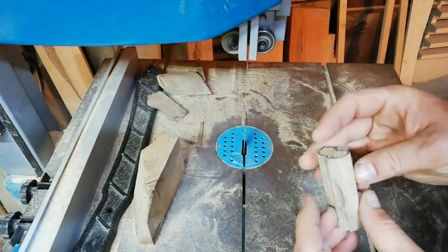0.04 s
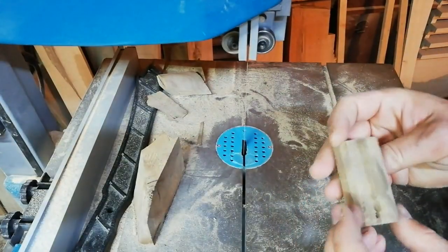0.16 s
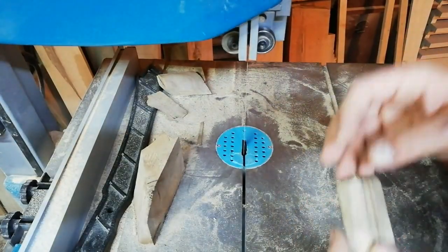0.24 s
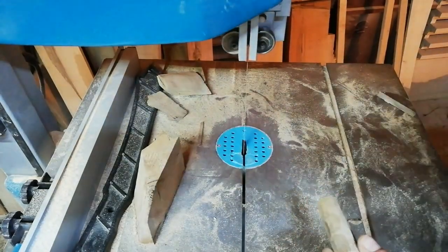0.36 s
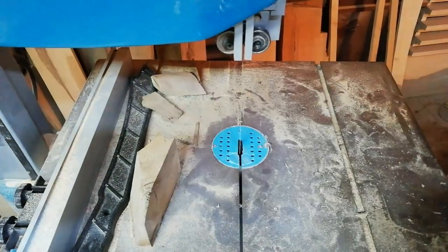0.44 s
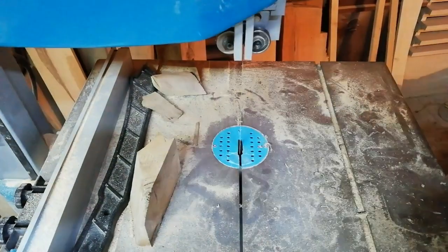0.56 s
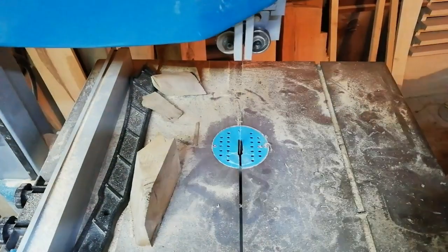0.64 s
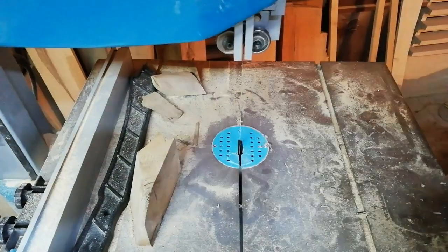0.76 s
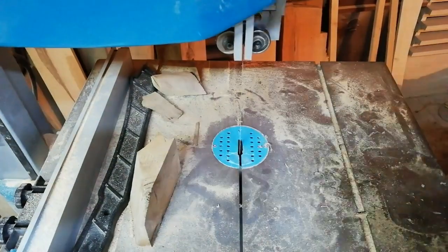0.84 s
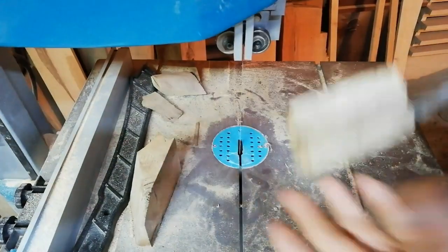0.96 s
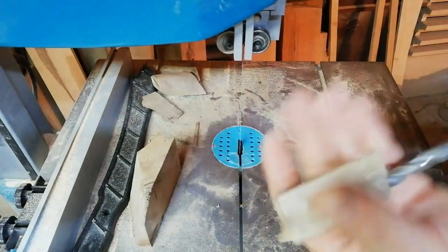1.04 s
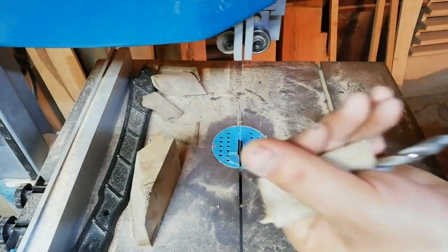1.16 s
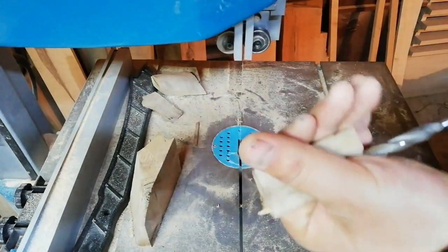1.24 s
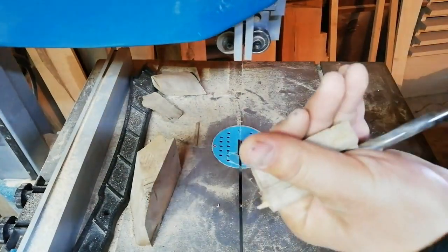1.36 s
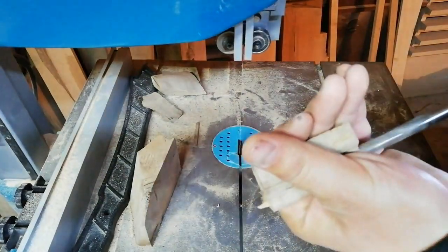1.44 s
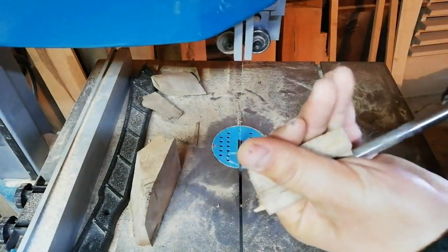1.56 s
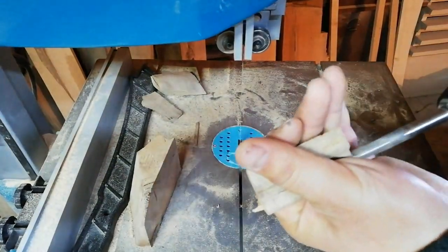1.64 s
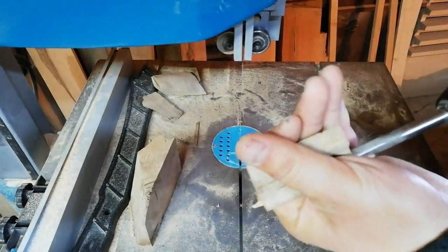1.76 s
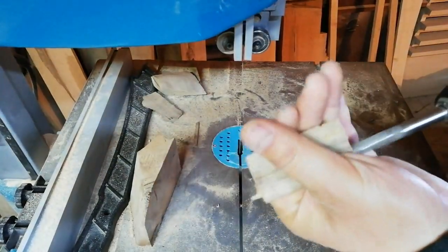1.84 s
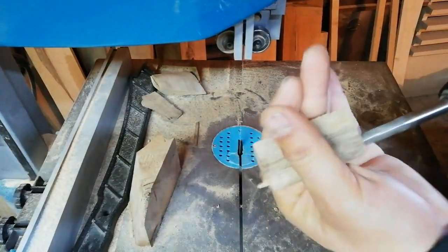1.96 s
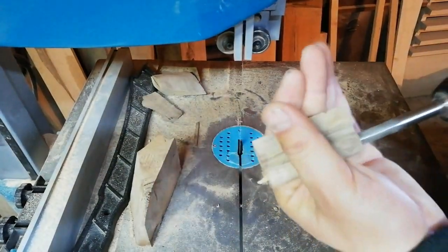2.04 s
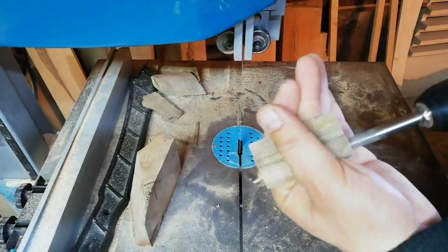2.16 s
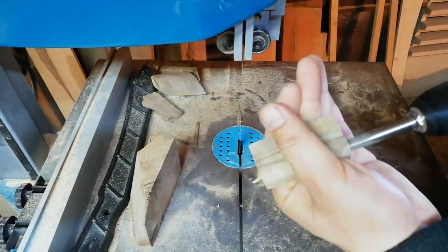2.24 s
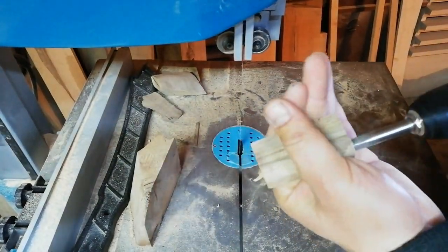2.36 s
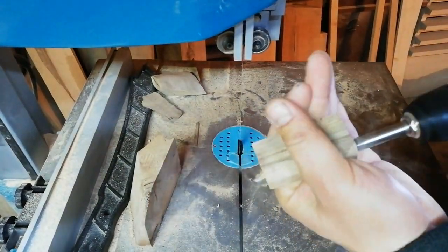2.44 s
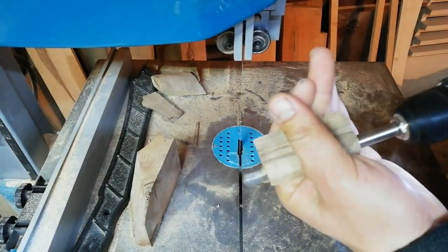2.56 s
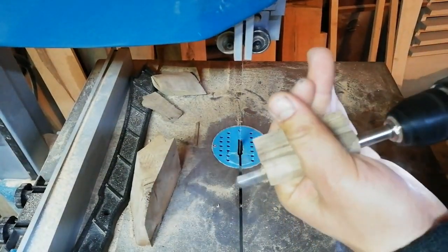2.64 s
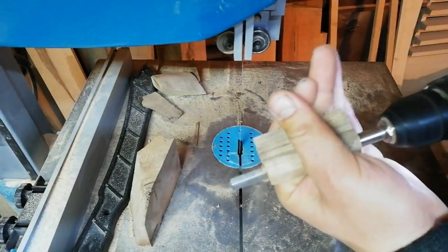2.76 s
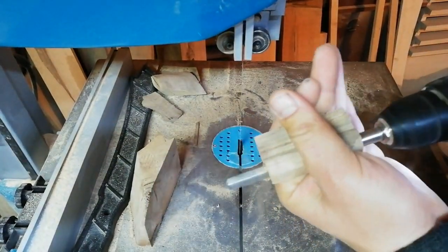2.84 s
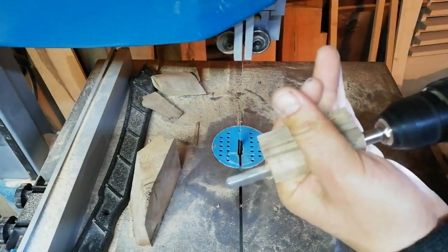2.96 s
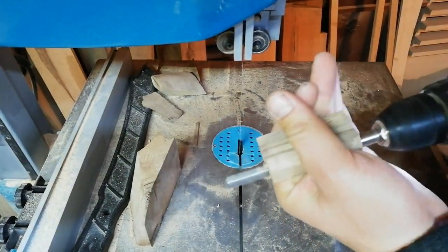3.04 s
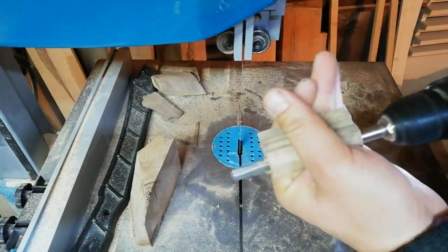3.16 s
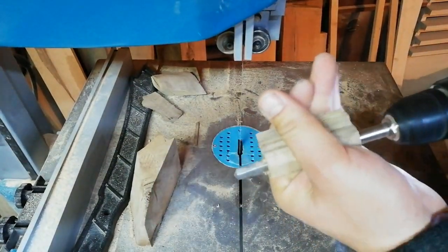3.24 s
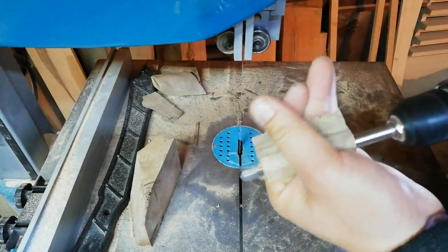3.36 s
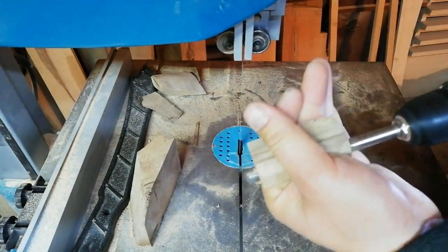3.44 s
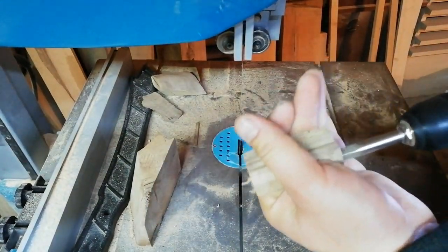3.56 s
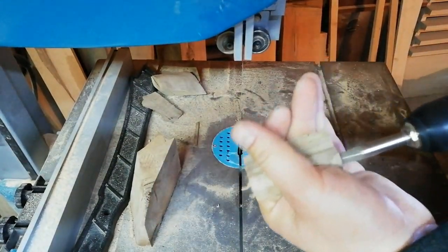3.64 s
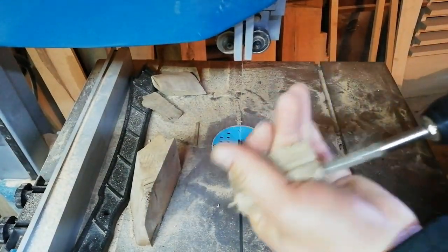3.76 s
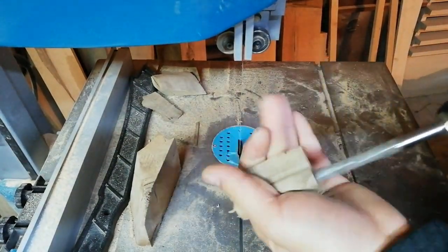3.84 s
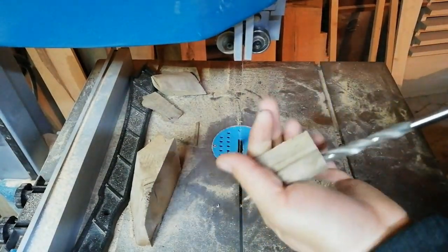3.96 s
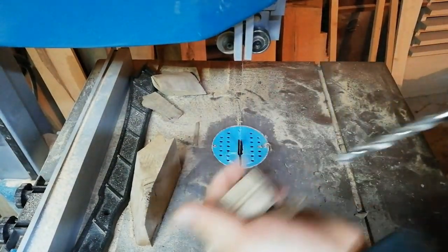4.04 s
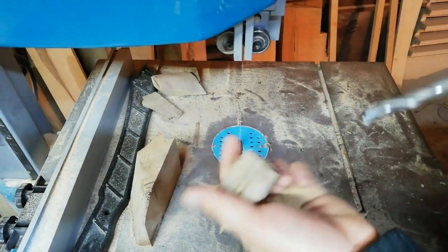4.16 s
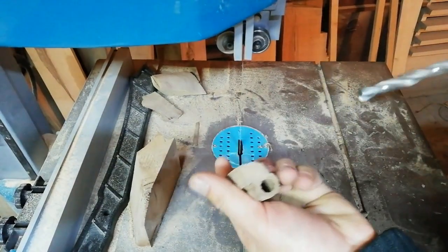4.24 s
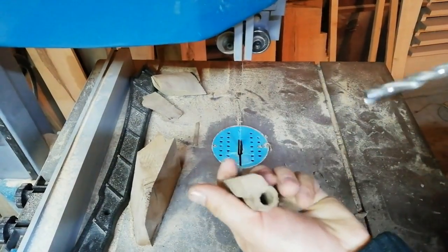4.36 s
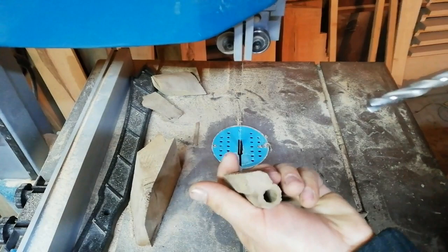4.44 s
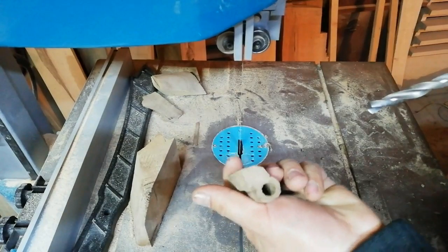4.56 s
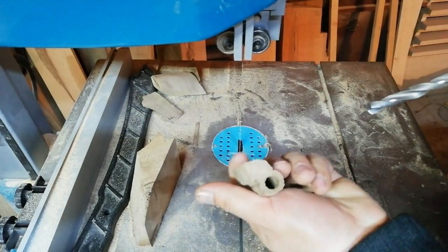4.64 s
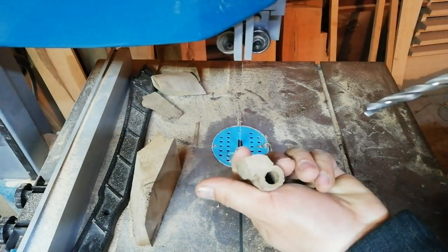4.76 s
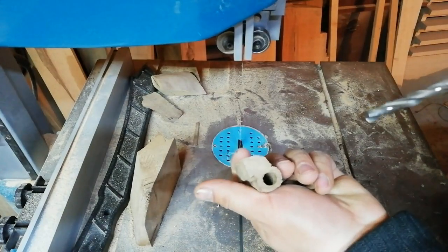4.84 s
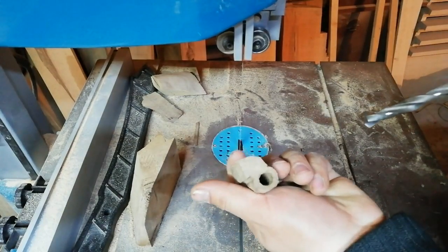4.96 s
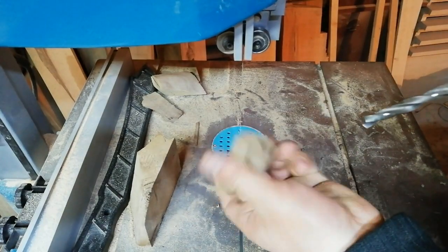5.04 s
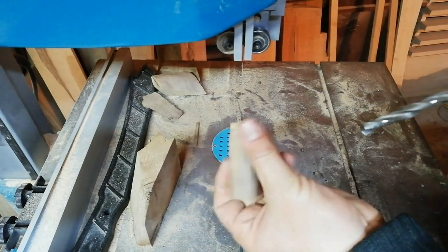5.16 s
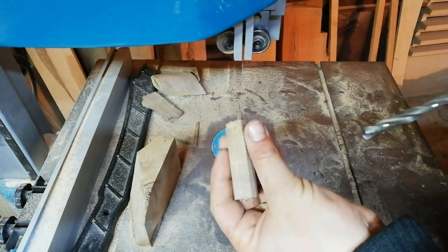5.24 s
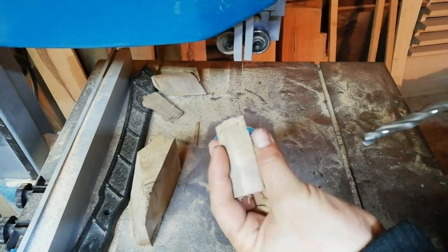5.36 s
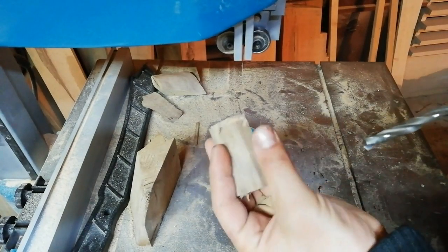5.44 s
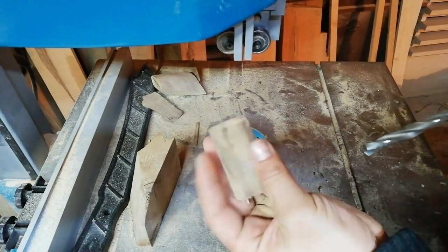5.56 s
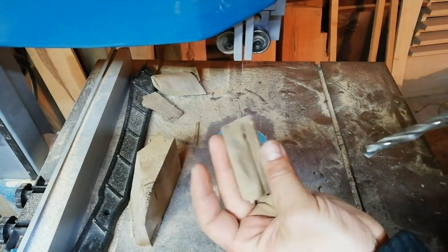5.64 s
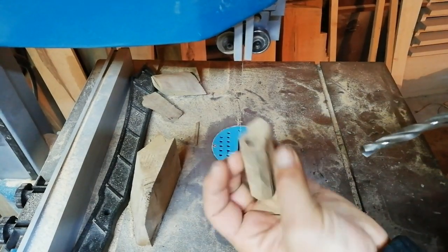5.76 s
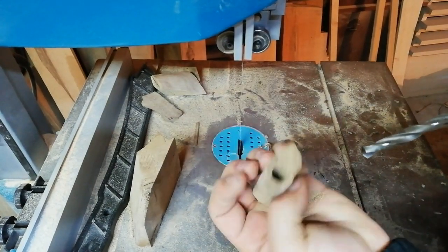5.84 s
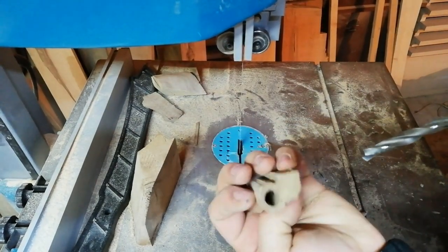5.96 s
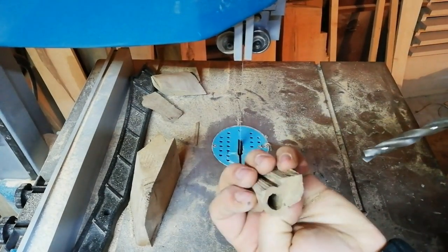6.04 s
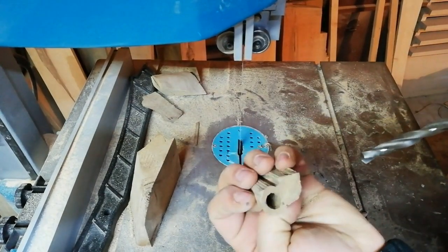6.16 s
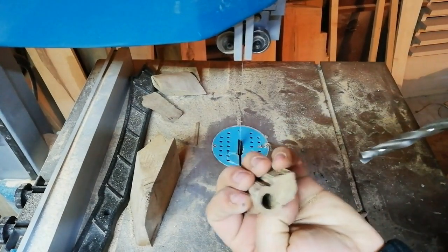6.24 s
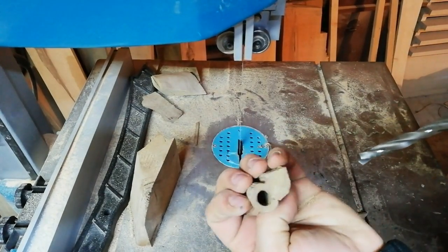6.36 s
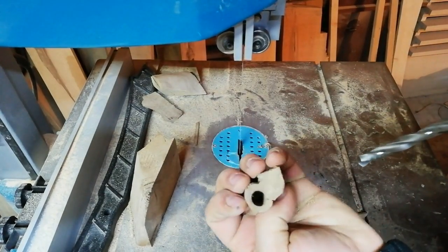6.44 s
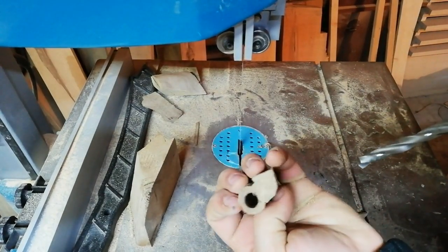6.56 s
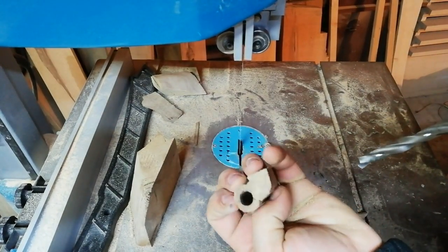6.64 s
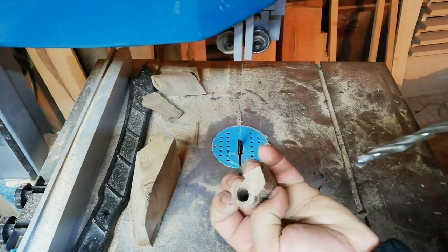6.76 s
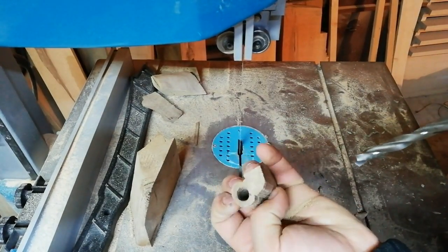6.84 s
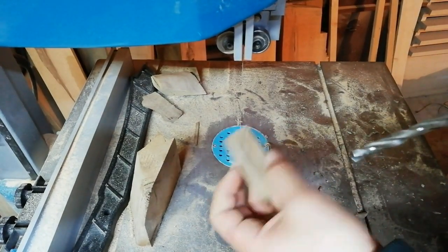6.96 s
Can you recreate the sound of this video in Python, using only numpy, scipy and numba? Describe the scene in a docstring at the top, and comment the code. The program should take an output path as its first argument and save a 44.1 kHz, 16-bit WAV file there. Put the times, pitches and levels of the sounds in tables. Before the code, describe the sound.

A band saw runs close by, a broad bright hiss with metallic ringing and tooth whine over low hum, until it is chopped off at about 0.45 s. Total silence lasts until 0.78 s, when a soft low thump brings in faint room tone. From 0.95 to 1.5 s fingers slide on a wood block, with small dry taps, the clearest near 1.24. At 1.5 s a drill starts, its gear whine dipping, then rising, over dry scraping. Piercing stuttering squeaks erupt around 2.3-2.9 s, pause in steadier grinding, return higher at 3.3-4.05 s, then lower at 4.25-4.55 s, so loud that everything else ducks. The whine climbs until the drill brakes at 4.73 s with a short gearbox clatter. Until nearly 7 s, faint finger rubs and tiny taps remain in the quiet workshop, close and left-leaning, with a short room tail.

```python
"""A band saw runs beside the microphone, cuts off into silence; a low thump brings the sound back.
Fingers slide on a hand-held wood block and it taps: filtered clicks and short decaying resonances.
A hand drill reams a hole: flutes scrape as dense filtered clicks, gears whine as rattling tones, and
where the bit binds it squeaks in short gliding tones that push a limiter down.
The gearbox clatters on braking; then fingers turn the block over."""
import sys
import numpy as np
from scipy import signal
from scipy.fft import rfft, irfft, next_fast_len
from scipy.io import wavfile
from scipy.ndimage import uniform_filter1d, minimum_filter1d
from numba import njit

SR = 44100
rng = np.random.default_rng(int(sys.argv[2]) if len(sys.argv) > 2 else 0)


def dump(signal):
    """Clip the signal to [-1, 1] and save it as 16-bit WAV at the path in sys.argv[1]."""
    limited = np.clip(np.atleast_2d(signal).T, -1, 1)
    pcm = np.round(limited * 32767).astype(np.int16)
    wavfile.write(sys.argv[1], SR, pcm)


N = 308461
TIME = np.arange(N) / SR
TOP_HZ = 16000

# squeaks of a flute on a tight spot, before scatter and lift: (first time [s], turns [count],
# nominal length [s], peak level [dB], start pitch [Hz], middle pitch [Hz], end pitch [Hz])
BINDS = [(2.3, 2, 0.0056, 1, 3450, 3147, 3020), (2.371, 3, .009, 4.5, 3050, 2980, 3520),
         (2.457, 3, .0062, 7.5, 3450, 3130, 3420), (2.537, 1, .0095, 5.5, 4370, 3800, 3340),
         (2.591, 5, .0105, 6.5, 3680, 4083, 3980), (2.621, 4, .0062, 5, 3000, 3755, 3950),
         (2.854, 1, 0.0047, 3, 3700, 3404, 3130), (2.887, 2, .005, -6, 3850, 3750, 3700),
         (2.915, 1, .0065, -12.5, 3550, 3490, 3500), (3.303, 1, .004, -11, 4360, 4710, 4810),
         (3.319, 1, 0.0049, -7, 4870, 4614, 4720), (3.416, 1, .005, -11, 5040, 4720, 4740),
         (3.477, 6, .0125, 8, 5150, 4760, 4450), (3.643, 2, .008, .5, 4920, 4726, 4530),
         (3.818, 2, .006, 6.5, 4650, 4880, 5100), (3.831, 2, .0055, -1, 4880, 4680, 4620),
         (3.87, 1, 0.0067, 6.5, 4820, 4510, 3530), (3.954, 1, .007, 4, 4850, 4750, 4690),
         (3.924, 2, .004, -6, 4730, 4770, 4760), (3.944, 1, .005, 4, 4870, 4990, 4700),
         (4.004, 1, .006, 8, 4685, 4910, 4610), (4.036, 1, .004, -4.5, 4700, 4840, 4800),
         (4.255, 1, .008, -15, 3350, 3436, 3700), (4.315, 1, .008, 5.5, 3800, 3780, 3980),
         (4.37, 3, .0105, 8.5, 3850, 4060, 4080), (4.34, 2, .0105, 3.5, 2850, 3750, 4600),
         (4.46, 2, .0045, 7, 3200, 3944, 3500), (4.538, 1, .009, 5, 4150, 3916, 3400)]
# treble balance of the squeaks: (frequency [Hz], gain [dB])
SQUEAK_TINT = [(5000, 0.5), (7000, 0.0), (9700, 4.5), (11500, -6), (15000, -7)]
# push on the drill: (time [s], scrape level [dB], gear load gain [dB])
PRESSURE = [(1.55, -26, -3), (1.75, -22, -2), (2.1, -21.3, -1), (2.25, -20.3, 5), (2.42, -17.5, -4.5),
            (2.75, -21, -1), (3.02, -17, 0), (3.45, -19, -0.5), (3.6, -16.5, 7), (4.0, -21, 2),
            (4.2, -18.5, 7), (4.45, -20, -1), (4.65, -19, 2)]
# drill motor speed: (time [s], gear whine [Hz])
MOTOR_SPEED = [(1.5, 1490), (1.55, 1395), (1.62, 893), (1.72, 950), (1.87, 1065), (2.15, 950), (2.24, 1280),
               (2.31, 1600), (2.45, 1645), (2.7, 1560), (3.15, 1480), (3.4, 1460), (3.55, 1395),
               (3.8, 1345), (4.0, 1375), (4.28, 1490), (4.65, 1670), (4.82, 1200)]
# flute scrape spectrum: (frequency [Hz], relative density [dB per Hz])
SCRAPE_SPECTRUM = [(59, -51.5), (100, -26), (389, -21.5), (547, -22), (676, -11.5), (970, -9), (1230, -15),
                   (1480, -9.5), (2000, -9), (2370, -6), (2990, -5), (6020, -3.5), (8460, -1), (9210, 5),
                   (16000, -30.5)]
# gear tones before load: (multiple of the whine [ratio], level [dB], rattle [0-1])
GEAR_TONES = [(.53, -49, 0.5), (1.0, -40.5, .65), (1.448, -46.5, .9), (1.999, -43.5, .9)]
# saw hiss spectrum: (frequency [Hz], relative density [dB per Hz])
SAW_SPECTRUM = [(40, -17.5), (100, -9), (150, -11), (230, -6.5), (300, -11), (480, -16), (650, -5),
                (1400, -11), (2000, -4), (3900, -10.5), (4700, -4.5), (6500, -5), (9600, 4), (15500, -19.5)]
# ringing of blade and guides: (frequency [Hz], width [Hz], level [dB])
SAW_MODES = [(783, 120, -37.5), (920, 38, -38.5), (1198, 40, -39.5), (1940, 90, -39.5), (2277, 80, -39.5),
             (2650, 70, -36.5), (3000, 70, -42.5), (3820, 70, -42), (4620, 150, -37.5), (12600, 25, -42.5)]
# saw tooth overtones, before a common lift: (multiple of the tooth rate [ratio], level [dB])
TOOTH_TONES = [(2, -46), (6, -38), (7, -47.5), (9, -39), (10, -46.5), (11, -53), (12, -35), (13, -36)]
# hum of saw motor and frame: (frequency [Hz], level [dB])
SAW_HUM = [(102.3, -43.5), (204.6, -41), (232, -44), (307, -53)]
# skin on wood spectrum: (frequency [Hz], relative density [dB per Hz])
SKIN_SPECTRUM = [(240, -38), (400, -16), (1020, -7), (1230, -6.5), (1740, -11), (2220, -9), (2470, -9.5),
                 (5270, -12), (9660, 0), (15000, -27)]
# finger strokes on the block: (time [s], peak level [dB], t60 [s])
STROKES = [(0.979, -49.5, 0.78), (1.115, -42.5, .38), (1.23, -48.5, .3), (1.3, -57.5, .4),
           (4.866, -51, 0.19), (4.93, -60, 0.35), (5.16, -52, 0.22), (5.67, -57, .25), (6.135, -56.5, 0.36),
           (6.199, -53.5, .9), (6.4, -54.5, .9), (6.65, -62.5, 0.66)]
# block and bit taps: (time [s], level [dB], centre [Hz], width [Hz], t60 [s])
TAPS = [(0.944, -47.5, 4000, 6000, 0.022), (1.067, -39.5, 8700, 2500, 0.017),
        (1.239, -29.5, 4050, 4950, 0.025), (1.374, -49.5, 1700, 910, 0.27), (1.439, -48, 7550, 3940, .015),
        (1.492, -44, 1900, 2000, 0.016), (4.878, -50, 1850, 4570, 0.076), (5.141, -52, 5000, 9000, .02),
        (5.172, -47, 8300, 2490, 0.075), (5.689, -62, 6620, 201, 0.27), (6.655, -55.5, 1140, 503, 0.52)]
# room tone spectrum: (frequency [Hz], relative density [dB per Hz])
FLOOR_SPECTRUM = [(30, -11), (70, -2), (130, -7), (230, -4.5), (380, -15), (560, -20.5), (900, -17),
                  (1500, -19), (2500, -21), (4500, -22), (9500, -25.5), (15000, -38.5)]
# difference of the ports in room tone, weak in the bass: (frequency [Hz], gain [dB])
SIDE_TINT = [(100, -12.5), (400, -1), (1500, 0.0)]
# shading of the right port from the work: (frequency [Hz], gain [dB])
PORT_SHADE = [(100, -2.5), (380, -1.5), (700, -6.5), (1300, -9.5), (2400, -15.5), (3500, -16),
              (4700, -22.5), (8000, -29.5), (15000, -30.5)]

WHINE_PER_TURN = 90
START_S, ATTACK_S, BRAKE_S, BRAKE_DB_PER_S = 1.5007, 0.04, 4.727, 470
GRIP_S, FULL_GRIP_DB = 0.09, 3  # reach around a squeak; squeak level of a fully bound bit
SQUEAK_LIFT_DB, SQUEAK_SCATTER, SQUEAK_SCATTER_DB = 1.5, 0.02, 0.98  # scatter: share of pitch; level
CHATTER_DB, CHATTER_GRIP_DB, CHATTER_DB_PER_OCTAVE = -46, 20, -7
BLOCK_DB, BLOCK_GRIP_DB, GEAR_GRIP_DB = -35, -9, -3.5
CLATTER_DB, CLATTER_S = -29, 0.035
SAW_OFF_S, THUMP_S = 0.442, 0.778
SAW_HISS_DB, TOOTH_HZ, TOOTH_LIFT_DB = -22, 770, 1.0
STROKE_ATTACK_S, FLOOR_DB = 0.014, -65.5


def drill():
    """Two flutes scrape the hole and ring the block; near a squeak the bit chatters at its pitch."""
    scrape_db, _ = curves(PRESSURE)
    close, tight, grip_hz = grip()
    angle = turns()
    flutes_db = 0.56 * np.sin(4 * np.pi * angle) + 0.47 * np.sin(2 * np.pi * angle)
    bite = undb(flutes_db + 1.2 * walk(450))
    scrape = unit(colour(grains(rate_hz=26000, spread_db=-0.1), SCRAPE_SPECTRUM)) * undb(scrape_db)
    knocks = grains(rate_hz=6000, spread_db=-1.0)
    block = unit(resonate(resonate(knocks, 1750, 1800), 1750, 2400))
    block = block * undb(BLOCK_DB + BLOCK_GRIP_DB * tight)
    octaves = np.log2(grip_hz / 3500)
    chatter_db = CHATTER_DB + close * (CHATTER_GRIP_DB + CHATTER_DB_PER_OCTAVE * octaves)
    chatter_hz = grip_hz * (1 + 0.032 * walk(130))
    # complex noise turns the chatter tone into a narrow band
    smear = walk(600) + 1j * walk(600)
    chatter = np.real(smear * np.exp(2j * np.pi * np.cumsum(chatter_hz) / SR))
    chatter = chatter * undb(chatter_db + 4.8 * walk(140))
    return bite * (scrape + block + chatter) * trigger()


def squeaks(rough=0.016, flutter_db=2.03, rasp=0.28, swell=0.9, fullness=0.59):
    """A flute sticks and slips in short gliding tones; low ones carry stronger overtones."""
    overtone_db, fall_db, pitch_db_per_octave = -15.5, -6.5, -17
    out = np.zeros(N)
    waver = 1 + rough * walk(1500)
    flutter = undb(flutter_db * walk(500))
    grit = 1 + rasp * walk(2500)
    rows = catches()
    for (s, length_s, db, *pitch_hz), chance in zip(rows, rng.standard_normal((len(rows), 4))):
        db = db + SQUEAK_SCATTER_DB * chance[0]
        pitch_hz = pitch_hz * (1 + SQUEAK_SCATTER * chance[1:])
        u = np.linspace(0, 1, max(int(1.1 * length_s * SR), 32))
        at = int(s * SR) + np.arange(len(u))
        # parabola through start, middle and end pitch
        hz = np.polyval(np.polyfit([0, 0.5, 1], pitch_hz, 2), u) * waver[at]
        phase = 2 * np.pi * np.cumsum(hz) / SR
        octaves = np.log2(hz / 3500)
        tone = np.sin(phase)
        for k in range(2, 5):
            db_k = overtone_db + fall_db * (k - 2.5) + pitch_db_per_octave * octaves * (k - 1)
            tone += grit[at] * undb(db_k) * np.sin(k * phase) * (k * hz < TOP_HZ)
        envelope = np.abs(np.sin(np.pi * u ** swell)) ** fullness
        out[at] += undb(db) * tone * flutter[at] * envelope
    # the bit rings on briefly
    ring = 0.14 * resonate(out, 3800, 90) + 0.3 * resonate(out, 4010, 100)
    ring = ring + 0.16 * resonate(out, 4200, 120)
    return colour(out + ring, SQUEAK_TINT) * undb(SQUEAK_LIFT_DB)


def gears(rattle_hz=170):
    """Gear tones follow motor speed, upper ones fading when slow; tooth play smears and clatters."""
    whine_hz, = curves(MOTOR_SPEED)
    _, load_db = curves(PRESSURE)
    _, tight, _ = grip()
    mesh = 2 * np.pi * np.cumsum(whine_hz) / SR
    tones = 0
    for k, db, rattle in GEAR_TONES:
        size = 1 + 0.29 * walk(30) + rattle * (walk(rattle_hz) + 1j * walk(rattle_hz))
        speed_gain = np.minimum(whine_hz / 1400, 1) ** (6 * (k - 0.5))
        tones = tones + undb(db) * np.real(size * np.exp(1j * k * mesh)) * speed_gain
    knocks = grains(rate_hz=6000, spread_db=-3.5)
    clatter = unit(resonate(resonate(knocks, 1500, 1600), 1500, 2200)) * undb(CLATTER_DB)
    clatter = clatter * np.exp(-np.abs(TIME - BRAKE_S) / CLATTER_S)
    return (tones * undb(load_db + GEAR_GRIP_DB * tight) + clatter) * trigger()


def turns():
    """Turns made by the bit: the integral of gear whine over whine cycles per turn."""
    return np.cumsum(curves(MOTOR_SPEED)[0]) / SR / WHINE_PER_TURN


def trigger():
    """Gain of the running drill: quick start, hold, braking."""
    attack = np.clip((TIME - START_S) / ATTACK_S, 0, 1) ** 2
    return attack * undb(-BRAKE_DB_PER_S * np.clip(TIME - BRAKE_S, 0, 1))


def catches():
    """Squeaks in order of time: each bind recurs at the same angle of the bit."""
    angle = turns()
    rows = []
    for first_s, count, *squeak in BINDS:
        first_angle = np.interp(first_s, TIME, angle)
        for k in range(round(count)):
            rows.append((np.interp(first_angle + k, angle, TIME), *squeak))
    return np.array(sorted(rows))


def grip():
    """Wood tightens before a squeak, loosens after: closeness (0-1), tightness (0-1), pitch [Hz]."""
    s, _, db, _, middle_hz, _ = catches().T
    nearest = np.searchsorted((s[1:] + s[:-1]) / 2, TIME)
    close = np.exp(-((TIME - s[nearest]) / GRIP_S) ** 2)
    tight = close * np.interp(TIME, s, np.minimum(undb(db - FULL_GRIP_DB), 1))
    return close, tight, uniform_filter1d(np.interp(TIME, s, middle_hz), size=4400)


def saw():
    """Blade hiss from filtered clicks, ringing from noise-fed modes, overtones of passing teeth."""
    hiss = unit(colour(grains(rate_hz=14000, spread_db=5.5), SAW_SPECTRUM)) * undb(SAW_HISS_DB)
    ring = 0
    for hz, width_hz, db in SAW_MODES:
        ring = ring + undb(db) * unit(resonate(rng.standard_normal(N), hz, width_hz))
    teeth = 2 * np.pi * np.cumsum(TOOTH_HZ + 0.5 * walk(40)) / SR
    whine = sum(undb(db + 2.9 * walk(42)) * np.sin(k * teeth) for k, db in TOOTH_TONES)
    return (hiss + ring + undb(TOOTH_LIFT_DB) * whine) * undb(1.4 * walk(60)) * gate(0, SAW_OFF_S)


def saw_hum():
    """The saw motor shakes the frame: wavering sines, alike at both ports."""
    hum = sum(undb(db + 3.0 * walk(18)) * np.sin(2 * np.pi * hz * TIME) for hz, db in SAW_HUM)
    return hum * gate(0, SAW_OFF_S)


def hands():
    """Skin slides on wood in decaying strokes of clicks; block and bit tap as decaying resonances."""
    out = np.zeros(N)
    slide = unit(colour(grains(rate_hz=5000, spread_db=-1.0), SKIN_SPECTRUM))
    for s, db, t60_s in STROKES:
        attack = np.clip((TIME - s) / STROKE_ATTACK_S, 0, 1)
        decay = np.exp(-np.log(1000) * np.maximum(TIME - s - STROKE_ATTACK_S, 0) / t60_s)
        out += slide * undb(db) * attack * decay
    for s, db, hz, width_hz, t60_s in TAPS:
        age_s = np.maximum(TIME - s, 0)
        envelope = undb(db - 60 * np.minimum(age_s / t60_s, 4)) * (TIME >= s)
        out += unit(resonate(rng.standard_normal(N), hz, width_hz)) * envelope
    return out


def thump(step_db=-24.5, settle_s=0.145, rumble_db=-41, rumble_s=0.031):
    """A step swings past rest and settles, with a short low rumble, as the sound returns."""
    age_s = np.maximum(TIME - THUMP_S, 0)
    step = -undb(step_db) * (1 - age_s / settle_s) * np.exp(-age_s / settle_s)
    rumble = unit(resonate(rng.standard_normal(N), 46, 23))
    rumble = undb(rumble_db) * rumble * np.exp(-age_s / rumble_s)
    return uniform_filter1d((step + rumble) * (TIME >= THUMP_S), size=3)


def quiet():
    """Room tone after the thump: bass mostly shared by both ports, hiss not."""
    mid, side = (unit(colour(rng.standard_normal(N), FLOOR_SPECTRUM)) for _ in range(2))
    side = colour(side, SIDE_TINT)
    return undb(FLOOR_DB) * np.array([mid + side, mid - side]) * (TIME > THUMP_S)


def workshop(x, t60_s=0.22, room_db=-19, near_db=-15, near_t60_s=0.15):
    """Reflections off table and saw frame plus room tail: two decaying noise responses."""
    t = TIME[:SR // 3]

    def tail(decay_s):
        """Decaying noise of unit energy after a 2 ms gap."""
        noise = rng.standard_normal(len(t)) * np.exp(-np.log(1000) * t / decay_s) * (t > 0.002)
        return noise / np.linalg.norm(noise)

    response = undb(near_db) * tail(near_t60_s) + undb(room_db) * tail(t60_s)
    return signal.fftconvolve(x, response)[:N]


def undb(db):
    """Decibels to gain."""
    return 10 ** (np.asarray(db) / 20)


def unit(x):
    """Scale to rms 1."""
    return x / np.sqrt(np.mean(x ** 2))


def curves(table):
    """Columns of a timed table, interpolated at each sample."""
    s, *columns = np.transpose(table)
    return [np.interp(TIME, s, c) for c in columns]


def colour(x, points):
    """Zero-phase filter through (frequency [Hz], gain [dB]) points on a log frequency axis."""
    hz, db = np.transpose(points)
    size = next_fast_len(N + 4096)
    f = np.maximum(np.arange(size // 2 + 1) * SR / size, 1)
    gain = undb(np.interp(np.log(f), np.log(hz), db))
    return irfft(rfft(x, size) * gain, size)[:N]


def resonate(x, hz, width_hz):
    """One resonance, gain 1 at its centre."""
    return signal.lfilter(*signal.iirpeak(hz, hz / width_hz, fs=SR), x)


def walk(rate_hz):
    """Smooth random curve of rms 1."""
    k = max(int(SR / rate_hz), 1)
    steps = np.repeat(rng.standard_normal(N // k + 1), k)[:N]
    return unit(uniform_filter1d(steps, k))


def grains(rate_hz, spread_db):
    """Random clicks of uneven size, as of snapping fibres; rms 1."""
    hit = rng.random(N) < rate_hz / SR
    size = undb(spread_db * np.minimum(rng.exponential(size=N), 3))
    return unit(hit * rng.standard_normal(N) * size)


def gate(start_s, end_s):
    """1 between two times, else 0."""
    return (TIME >= start_s) & (TIME < end_s)


@njit
def follow(x, release):
    """Peak follower: jumps up at once, sinks slowly."""
    out, e = np.empty(len(x)), 0.
    for i in range(len(x)):
        e = max(x[i], e * release)
        out[i] = e
    return out


def scene():
    """Work near the left port; the right gets it later, duller, roomier, but faces the motor."""
    motor = gears()
    work = saw() + drill() + squeaks() + hands() + motor
    bounce_samples, port_samples = 235, 26  # off the table; round to the right port
    bounce = undb(-20.5) * np.pad(work, (bounce_samples, 0))[:N]
    left = work + bounce + workshop(work, t60_s=0.27, room_db=-16, near_db=-16)
    late = np.pad(work, (port_samples, 0))[:N]
    right = colour(late + workshop(work, t60_s=0.4, room_db=-1.5, near_db=-6.5), PORT_SHADE)
    right = right + workshop(motor, t60_s=0.25, room_db=-17, near_db=-7.5)
    near = np.array([left, right]) * ~gate(SAW_OFF_S, THUMP_S)
    return near + saw_hum() + quiet() + thump()


def record(dry, ceiling=1.0, release_db_per_s=42, thud_db=-25):
    """A look-ahead limiter ducks all around loud peaks; overload adds a thud; low-pass at TOP_HZ."""
    peak = follow(np.abs(dry).max(axis=0), float(undb(-release_db_per_s / SR)))
    gain = np.minimum(ceiling / (peak + 1e-9), 1)
    gain = uniform_filter1d(minimum_filter1d(gain, size=330), size=150)
    out = dry * gain
    # one-sided overload turns the envelope of a loud left signal into bass
    overload = uniform_filter1d(uniform_filter1d(np.abs(out[0]) ** 3, size=30), size=22)
    thud = signal.sosfilt(signal.butter(1, [35, 300], "band", fs=SR, output="sos"), overload)
    lowpass = signal.ellip(8, 0.2, 70, TOP_HZ, fs=SR, output="sos")
    return signal.sosfilt(lowpass, out + undb(thud_db) * thud)


dry = scene()
out = record(dry)
dump(out)
```